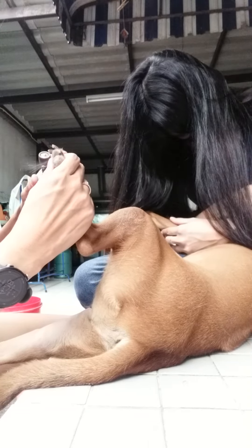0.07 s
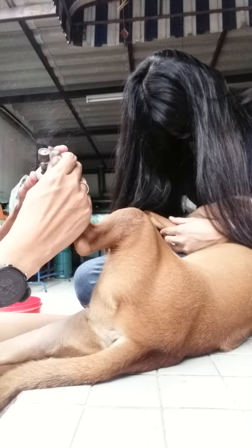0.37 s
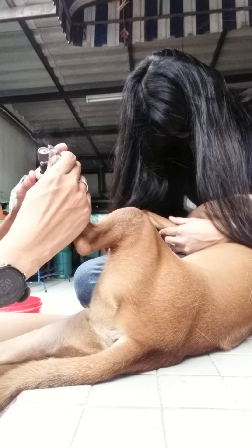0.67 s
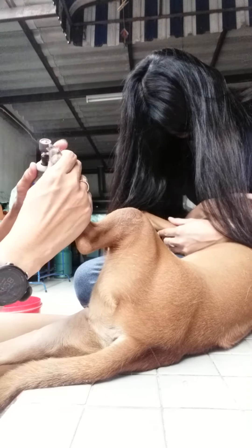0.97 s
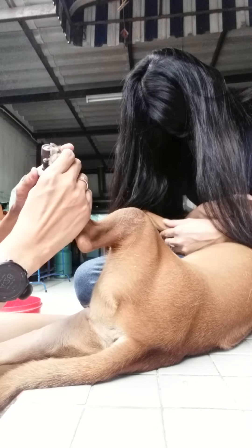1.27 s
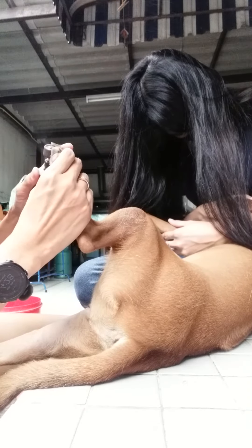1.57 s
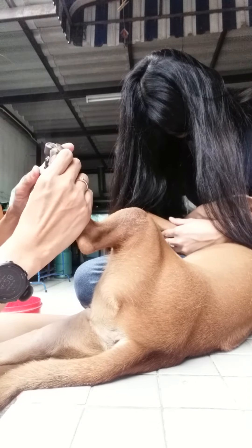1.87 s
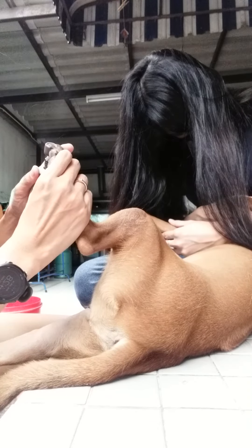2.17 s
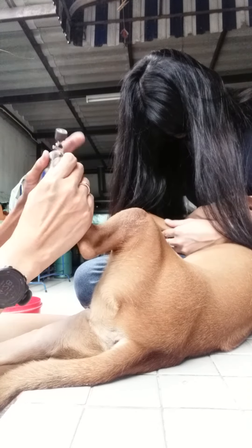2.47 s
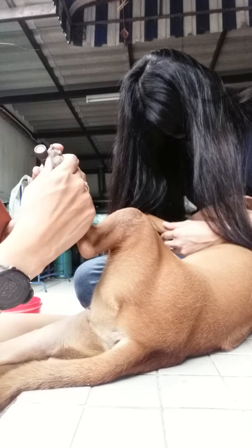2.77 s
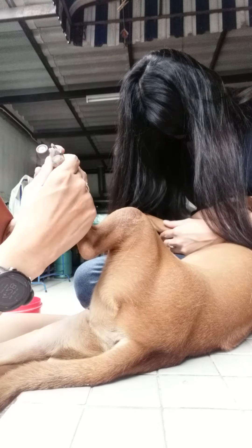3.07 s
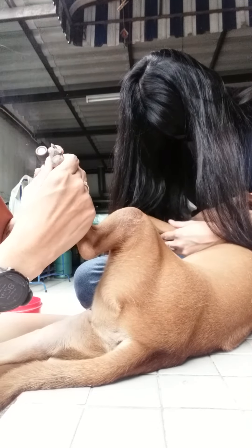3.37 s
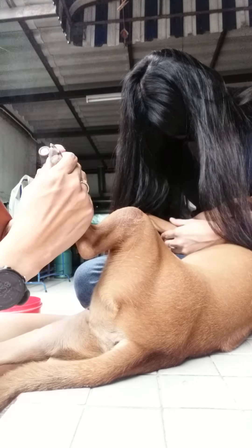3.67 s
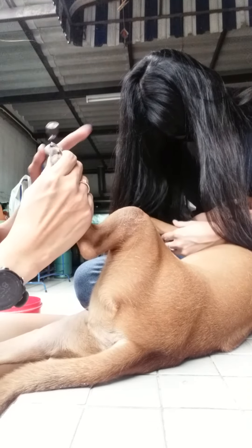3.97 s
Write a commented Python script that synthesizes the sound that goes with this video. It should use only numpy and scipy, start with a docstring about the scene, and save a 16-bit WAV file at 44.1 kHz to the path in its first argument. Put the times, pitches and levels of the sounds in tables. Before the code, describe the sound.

A small rotary grinder whines up close throughout, rasping and chattering against a dog's nail. The scraping swells with a brief squeal near 0.8 seconds, eases at 1.1, then builds to another squeal around 2.3. The motor spins freely until a tick at 2.7 starts more grinding, harshest near 3.7, before running free again. Its pitch sags with each press. Faint outdoor rumble lies underneath.

```python
"""Filing a dog's nails

A small handheld rotary grinder works on a tiled, roofed porch, with faint outdoor rumble behind it.
The motor whines at six times its spin rate and slows under load. When the drum touches the nail,
the same grit scrapes past on every turn. The nail knocks once a turn and makes the housing ring,
ticks as the drum catches it, and squeals when pressed."""
import sys
import numpy as np
from scipy import signal
from scipy.fft import rfft, irfft, next_fast_len
from scipy.io import wavfile
from scipy.ndimage import uniform_filter1d

SR = 44100
rng = np.random.default_rng(int(sys.argv[2]) if len(sys.argv) > 2 else 0)


def bounce(signal):
    """Save signal as a 16-bit WAV file at the path given by the first command-line argument."""
    frames = np.transpose(np.atleast_2d(signal))
    limited = np.clip(frames, -1, 1)
    pcm = np.round(limited * 32767).astype(np.int16)
    wavfile.write(sys.argv[1], SR, pcm)


N = 176400
TIME = np.arange(N) / SR

# How fast the drum spins: time_s, turns_per_s
SPIN_SPEED = [(0.0, 208.5), (0.15, 193.4), (0.2, 193.8), (0.284, 180.2), (0.404, 191.4), (0.549, 188.4),
              (0.703, 196.6), (0.833, 185.1), (0.923, 171.4), (0.953, 173.0), (0.983, 182.1),
              (1.063, 190.0), (1.127, 201.7), (1.187, 205.7), (1.287, 202.1), (1.551, 197.6),
              (1.616, 193.7), (2.15, 181.9), (2.38, 177.4), (2.434, 193.9), (2.504, 202.9), (2.594, 206.0),
              (2.804, 203.6), (3.118, 181.4), (3.377, 183.9), (3.447, 190.1), (3.522, 188.4),
              (3.667, 174.2), (3.692, 168.6), (3.727, 153.5), (3.746, 149.7), (3.786, 155.0),
              (3.826, 184.4), (3.861, 196.2), (3.931, 204.8), (4.001, 205.3)]
# How the motor's main whine rises and falls: time_s, level_db
WHINE_LEVEL = [(0, -26.5), (0.08, -35), (0.2, -41), (0.33, -47), (0.42, -35.5), (0.8, -32.5), (0.93, -59),
               (1.1, -29), (1.38, -28.5), (1.5, -34.5), (1.72, -31.5), (2.15, -37.5), (2.3, -47),
               (2.41, -36.5), (2.49, -26.5), (2.8, -30), (3.0, -39.5), (3.17, -53), (3.55, -37),
               (3.79, -53), (3.87, -29.5), (4, -28.5)]
# The motor's other tones: multiple_of_spin, level_db, share_of_whine_swing_followed
MOTOR_TONES = [(3, -47, 0.42), (4, -43, 0.53), (5, -51.5, 0.036), (7, -41.5, 0.2), (8, -49.5, 0.12),
               (9, -44, 0.67), (10, -54.5, 0.017), (11, -52, 0.25), (12, -46.5, 0.65), (13, -51, 0.3),
               (14, -55.5, 0.22), (15, -48, 0.4)]
# How strongly the case sings along with the motor: time_s, level_db
CASE_LEVEL = [(0, -41.5), (.1, -35), (.25, -41.5), (.6, -44), (.7, -36.5), (1.2, -39.5), (1.32, -37),
              (1.42, -42), (1.88, -42), (2.0, -37), (2.2, -32.5), (2.42, -41), (2.6, -38), (2.8, -39.5),
              (2.95, -48), (3.6, -49), (4, -45)]
# Tone colour of the buzz from the motor's brushes: pitch_hz, gain_db
BUZZ_COLOUR = [(500, -7.5), (2000, -24.5), (3000, -10), (3750, 8.5), (4700, -2), (6000, -23), (8500, -5.5),
               (11500, -17.5), (13500, -41), (15500, -35)]
# How hard the nail knocks on the drum: time_s, level_db
KNOCK_LEVEL = [(0, -42), (0.05, -30.5), (0.25, -38.5), (0.295, -28.5), (0.34, -44), (0.46, -36),
               (0.62, -31), (0.69, -36), (0.77, -32.5), (0.9, -28.5), (0.935, -36), (1.06, -29), (1.1, -49),
               (1.21, -34), (1.27, -33.5), (1.54, -38.5), (1.59, -30), (1.84, -41), (1.91, -31),
               (2.08, -33.5), (2.32, -29), (2.42, -37), (2.78, -41), (2.87, -40), (3.03, -33.5),
               (3.07, -56), (3.33, -40), (3.41, -33), (3.5, -37), (3.66, -31.5), (3.71, -44.5), (3.76, -34),
               (3.82, -29), (4, -47)]
# Uneven knock timing, low when the nail sits firmly, high when it chatters: time_s, scatter_turns
NAIL_CHATTER = [(0, 0.012), (.3, 0.011), (.45, 0.013), (.8, 0.0023), (.9, 0.02), (1.05, 0.0019),
                (1.27, 0.019), (1.48, 0.016), (1.58, 0.0013), (2.2, 0.0012), (2.38, 0.021), (2.5, 0.0058),
                (2.85, 0.01), (3.07, 0.00099), (3.33, 0.00082), (3.4, 0.0046), (3.47, 0.0018),
                (3.62, 0.0018), (3.73, 0.017)]
# Pitches at which the knocked housing rings: pitch_hz, width_hz, gain_db
HOUSING_RINGS = [(1132, 384, 2.5), (1349, 223, 6.5), (1534, 270, 1), (2740, 470, -8.5), (4590, 105, -11.5),
                 (5900, 310, -16)]
# How hard the grit scrapes the nail: time_s, level_db
SCRAPE_LEVEL = [(0, -39), (0.02, -36), (0.19, -41), (0.207, -28.5), (0.24, -35), (0.4, -39.5),
                (0.48, -33.5), (0.62, -42.5), (0.71, -38.5), (0.76, -30), (0.89, -25), (0.94, -20),
                (0.98, -34.5), (1.04, -36.5), (1.085, -35), (1.098, -48), (1.222, -49), (1.235, -40),
                (1.35, -43), (1.38, -52), (1.42, -38.5), (1.85, -37), (2.0, -32.5), (2.355, -28),
                (2.397, -21), (2.405, -46), (2.47, -49), (2.724, -52.5), (2.729, -34), (2.742, -41.5),
                (2.765, -55), (2.804, -53), (2.81, -33.5), (2.845, -36), (2.875, -38.5), (2.95, -33.5),
                (2.99, -40), (3.08, -32), (3.23, -31), (3.38, -39), (3.68, -30.5), (3.73, -21.5),
                (3.763, -24), (3.772, -48.5), (3.83, -48.5), (4, -52)]
# Tone colour of the scraping: pitch_hz, gain_db
SCRAPE_COLOUR = [(400, -14), (1000, 2), (1500, 12), (2100, -3), (2700, 2.5), (3100, -3), (3700, 6.5),
                 (4600, -1.5), (5700, 0), (6900, -4.5), (8500, 0), (10000, 0), (11800, 0.5), (13500, -2.5),
                 (15500, -5)]
# The scraped nail rings at different pitches from time to time as its grip changes: start_s, end_s, pitch_hz,
# half_width_hz, gain_db
SCRAPED_NAIL_RINGS = [(0.413, 0.56, 5200, 600, -4), (0.936, 1.06, 5140, 448, 3.5),
                      (1.88, 2.4, 3570, 298, -4), (1.95, 2.42, 10400, 497, -16),
                      (2.697, 3.8, 11810, 780, -1), (3.537, 3.79, 4750, 600, -8.5),
                      (3.735, 3.77, 5640, 1200, -1.5)]
# Tone colour of the outdoor rumble: pitch_hz, gain_db
RUMBLE_COLOUR = [(20, -37), (45, -16), (66, -44), (80, 5.5), (97, -8), (115, 2), (150, -3.5), (220, -2),
                 (350, -6.5), (600, -3), (1200, -8.5), (3000, -12), (15000, -29)]
# Ticks as the drum catches the nail: start_s, level_db
CATCH_TICKS = [(.204, -34), (1.228, -38), (1.294, -35), (2.728, -29), (2.809, -31)]
# Squeals of the pressed nail: start_s, end_s, pitch_hz, level_db, flutter_db
# A row that ends before it starts is silent.
NAIL_SQUEALS = [(0.74, 0.867, 1570, -26, 3), (0.826, .905, 1600, -24, 3.5), (2.21, 2.36, 1520, -29, 1.5),
                (3.43, 3.62, 1510, -39, 0.5), (3.13, 2.6, 2800, -39.5, 2), (1.41, 2.4, 5750, -47, 1.5),
                (1.8, 1.7, 4560, -42, -2)]
# How much louder the left side is than the right: pitch_hz, left_minus_right_db
LEFT_BALANCE = [(300, -12), (740, -14), (1250, -8), (1600, -18.5), (2010, 0.5), (2700, -1), (3500, 1.5),
                (5500, -7), (9080, 4.5), (11500, -4), (15000, -9)]
# How far the left side's wave runs ahead of the right's: pitch_hz, lead_radians
LEFT_LEAD = [(100, 0), (700, .25), (1290, -.3), (1600, .5), (2000, 1.2), (2580, 1.5), (5250, 6.1),
             (8500, 9.6), (10200, 10.9), (15500, 16.7)]

PULLS_PER_TURN = 6   # the motor's pulls set the pitch of the whine
SIDES = np.array([[1], [-1]])   # add on the left, subtract on the right


def from_db(db):
    """Turn decibels into a number to multiply a sound by."""
    return 10 ** (np.asarray(db) / 20)


def unit_power(x):
    """Scale a signal so that its average power is 1."""
    return x / np.sqrt(np.mean(x ** 2) + 1e-20)


def over_time(rows):
    """Join a table's points with straight lines, giving a value for every sample."""
    return np.interp(TIME, *np.transpose(rows))


def at_pitch(rows, hz):
    """Read a table between its pitches, with every octave equally wide."""
    pitches, values = np.transpose(rows)
    return np.interp(np.log(hz + 1), np.log(pitches), values)


def filtered(x, response):
    """Multiply each frequency in a sound by response(hz)."""
    size = next_fast_len(N + SR // 2)
    hz = np.arange(size // 2 + 1) * SR / size
    return irfft(rfft(x, size) * response(hz), size)[..., :N]


def coloured(x, colour):
    """Give a sound the tone colour in a table, at power 1."""
    return unit_power(filtered(x, lambda hz: from_db(at_pitch(colour, hz))))


def drift(rate_hz):
    """A smooth random wobble, about 1 in size, that changes roughly rate_hz times a second."""
    step, warm_up = 40, 2000
    keep = np.exp(-2 * np.pi * rate_hz * step / SR)
    noise = rng.standard_normal(N // step + warm_up + 2)
    slow = signal.lfilter([1], [1, -2 * keep, keep * keep], noise)[warm_up:]
    return np.interp(np.arange(N) / step, np.arange(len(slow)), unit_power(slow))


def during(start_s, end_s, fade_s=.03):
    """1 while a contact lasts and 0 outside it, with short fades."""
    return np.clip(np.minimum(TIME - start_s, end_s - TIME) / fade_s + .5, 0, 1)


def touching(touch_db=-47.5):
    """Near 1 while the nail is on the drum, near 0 once the scraping falls well below touch_db."""
    return 1 / (1 + from_db(touch_db - over_time(SCRAPE_LEVEL)) ** 2)


def clicks(turns, at_turn, strength):
    """Make a click each time the shaft's running count of turns reaches a value in at_turn."""
    position = 2 * np.interp(at_turn.ravel(), turns, np.arange(N))   # in half samples, for finer timing
    strength = (strength * (at_turn > turns[0]) * (at_turn < turns[-1])).ravel()
    slot = position.astype(int)
    before = np.bincount(slot, strength * (1 - position + slot), 2 * N)
    after = np.bincount(slot + 1, strength * (position - slot), 2 * N)
    return signal.resample_poly(before + after, 1, 2)


def rough_spots(turns, fresh_share, memory_turns, swell_depth, count, max_turns=900):
    """Rough spots click past once a turn; their bite changes slowly, and is partly new each time."""
    slip_turns, size_spread_db = 0.0006, 4.5   # tiny slips in timing turn the highest tones into hiss
    shape = (max_turns, count)
    angle = (np.arange(count) + rng.random(count)) / count
    at_turn = np.arange(max_turns)[:, None] + angle + slip_turns * rng.standard_normal(shape)
    keep = np.exp(-1 / memory_turns)
    first_bite = rng.standard_normal((1, count))
    changes = rng.standard_normal(shape)
    bite, _ = signal.lfilter([np.sqrt(1 - keep ** 2)], [1, -keep], changes, axis=0, zi=keep * first_bite)
    chips = rng.standard_normal(shape)
    sizes = from_db(size_spread_db * np.clip(rng.standard_normal(shape), -2, 2))
    fresh = np.clip(np.interp(at_turn, turns, np.broadcast_to(fresh_share, N)), 0, 1)
    strength = np.sqrt(1 - fresh) * bite + np.sqrt(fresh) * unit_power(chips * sizes)
    swell = 1 + swell_depth * np.cos(2 * np.pi * angle)   # rises and falls once a turn
    return clicks(turns, at_turn, swell * strength)


def singing(turns, hz, half_width_hz):
    """A part that rings near hz sings on whichever multiples of the spin come close, at power 1."""
    spin = over_time(SPIN_SPEED)
    multiples = np.arange(int(hz / spin.max()), int(hz / np.percentile(spin, 10)) + 2)[:, None]
    weight = 1 / (1 + ((multiples * spin - hz) / half_width_hz) ** 2)
    tones = np.sin(2 * np.pi * multiples * (turns + rng.random()))
    return np.sum(weight * tones, axis=0) / np.sqrt(np.sum(weight ** 2, axis=0) / 2)


def motor(turns):
    """Six pulls a turn make the whine; other tones join it, the case sings and the brushes buzz."""
    free_running_db, whine_gain_db, waver_db, brush_db = -24, -0.7, 2, -47
    whine_db = over_time(WHINE_LEVEL)
    tones = from_db(whine_db + whine_gain_db) * np.sin(2 * np.pi * PULLS_PER_TURN * turns)
    for multiple, db, follows in MOTOR_TONES:
        level_db = db + follows * (whine_db - free_running_db) + waver_db * drift(12.2)
        tones += from_db(level_db) * np.sin(2 * np.pi * (multiple * turns + rng.random()))
    case_db = over_time(CASE_LEVEL) + waver_db * drift(45)
    case = from_db(case_db) * singing(turns, hz=2700, half_width_hz=140)
    sparks = rough_spots(turns, fresh_share=0.046, memory_turns=110, swell_depth=1.0, count=60)
    return np.sqrt(2) * tones + case + from_db(brush_db) * coloured(sparks, BUZZ_COLOUR)


def housing_ring(hits, knock_db):
    """Hits ring the housing; firm knocks favour the higher of its rings below 2000 Hz."""
    usual_knock_db, brightening, waver_db = -33, 2, 3
    pivot_hz = HOUSING_RINGS[1][0]
    sound = 0
    for k, (hz, width_hz, db) in enumerate(HOUSING_RINGS):
        keep = np.exp(-np.pi * width_hz / SR)
        feed = (1 - keep ** 2) / 2
        ring_filter = [feed, 0, -feed, 1, -2 * keep * np.cos(2 * np.pi * hz / SR), keep ** 2]
        ring = signal.sosfilt([ring_filter] * 2, hits + 1e-18)
        tilt_db = brightening * (knock_db - usual_knock_db) * np.log2(hz / pivot_hz) * (hz < 2000)
        sound += (-1) ** k * from_db(db + tilt_db + waver_db * drift(22)) * ring
    return sound


def without_whine(x, turns):
    """Cut the whine's pitch out of a sound, leaving that pitch to the motor."""
    whine_wave = np.exp(2j * np.pi * PULLS_PER_TURN * turns)
    amount = signal.sosfiltfilt(signal.butter(2, 25, fs=SR, output="sos"), x / whine_wave)
    return x - 2 * np.real(amount * whine_wave)


def knocking(turns, max_turns=900):
    """The drum's high spot hits the nail once a turn, with a weaker rebound; the housing rings."""
    wander_turns, rebound_turns, rebound_db = 0.036, 0.316, -12.5
    spread_db_per_turn, gain_db, sputter_db = 191, 1.5, 2
    turn, level_db = np.arange(max_turns), over_time(KNOCK_LEVEL)
    scatter = np.interp(turn, turns, over_time(NAIL_CHATTER))
    wander = wander_turns * np.interp(turn, turns, drift(3.48))
    hit_at = turn + wander + scatter * rng.standard_normal(max_turns)
    rebound_at = hit_at + rebound_turns * (1 + 0.099 * np.interp(turn, turns, drift(1.27)))
    # Uneven timing also means uneven strength.
    chance = np.clip(rng.standard_normal((2, max_turns)), -2, 1.5)
    hit_size, rebound_size = from_db(spread_db_per_turn * scatter * chance)
    hits = clicks(turns, hit_at, hit_size) + from_db(rebound_db) * clicks(turns, rebound_at, rebound_size)
    ring = without_whine(housing_ring(hits, level_db), turns)
    levelled = ring / np.sqrt(uniform_filter1d(unit_power(ring) ** 2, size=2600) + .01)
    uneven_db = sputter_db * np.tanh(drift(27))   # the nail catches unevenly
    return unit_power(levelled) * touching() * from_db(level_db + gain_db + uneven_db)


def scraping(turns):
    """Grit rasps the nail: pitched when it sits firmly, noisier in chatter, bright and noisy if pressed."""
    seated_fresh, fresh_per_scatter, hard_press_db = .004, 8, -16
    usual_db, brightening, treble_hz = -39.5, 0.55, 7200
    side_db, gain_db, flutter_db = -4, 3, 1.5
    level_db = over_time(SCRAPE_LEVEL)
    fractures = np.minimum(from_db(level_db - hard_press_db), 1) ** 3
    fresh_share = seated_fresh + fresh_per_scatter * over_time(NAIL_CHATTER) + fractures
    middle, side = (rough_spots(turns, fresh_share, memory_turns=40, swell_depth=0.37, count=110)
                    for _ in range(2))
    scrape = coloured(middle + from_db(side_db) * side * SIDES, SCRAPE_COLOUR)
    # Under pressure, the lower part swells less than the treble.
    low = filtered(scrape, lambda hz: 1 / (1 + (hz / treble_hz) ** 6))
    scrape = scrape - low + low * from_db(brightening * (usual_db - level_db))
    rings = 0
    for start_s, end_s, hz, half_width_hz, db in SCRAPED_NAIL_RINGS:
        ring = signal.lfilter(*signal.iirpeak(hz, hz / (2 * half_width_hz), fs=SR), scrape)
        rings += during(start_s, end_s) * from_db(db) * ring
    return (scrape + rings) * from_db(level_db + gain_db + flutter_db * drift(18.4))


def outdoor_rumble(level_db=-43, side_db=-24, left_minus_right_db=-2):
    """Steady distant rumble, nearly alike on both sides."""
    middle, side = coloured(rng.standard_normal((2, N)), RUMBLE_COLOUR)
    gains = from_db(level_db + SIDES * left_minus_right_db / 2)
    return gains * (middle + SIDES * from_db(side_db) * side)


def catching(decay_s=.006):
    """On first touch, grit chips the nail in a short burst of cracks."""
    cracks = coloured(rng.standard_normal((2, N)) ** 3, SCRAPE_COLOUR)   # cubing makes noise spiky
    bursts = sum(from_db(db) * (TIME > start_s) * np.exp(-np.abs(TIME - start_s) / decay_s)
                 for start_s, db in CATCH_TICKS)
    return cracks * bursts


def squealing(turns):
    """The pressed nail locks to the turning drum and squeals."""
    sound = 0
    for start_s, end_s, hz, db, flutter_db in NAIL_SQUEALS:
        loudness = during(start_s, end_s) * from_db(db + flutter_db * np.tanh(drift(21)))
        sound += loudness * singing(turns, hz, half_width_hz=170)
    return sound


def echoes(fade_s, size=22050):
    """A scatter of echoes, different on each side, that falls by 60 dB in fade_s."""
    t = np.arange(size) / SR
    tail = rng.standard_normal((2, size)) * from_db(-60 * t / fade_s) * (t > .001)
    return tail / np.sqrt(np.sum(tail ** 2, axis=1, keepdims=True))


def microphones(hz):
    """Each pitch reaches two spaced microphones with a different strength and delay."""
    left = from_db(at_pitch(LEFT_BALANCE, hz))
    right = np.exp(-1j * np.interp(hz, *np.transpose(LEFT_LEAD)))
    return np.array([left, right]) * np.sqrt(2 / (1 + left ** 2))


def porch(direct, near_db=-3.5, far_db=-15, low_cut_hz=1900):
    """The direct sound arrives along with bright echoes from hands, tiles and roof."""
    tail = from_db(near_db) * echoes(fade_s=0.081) + from_db(far_db) * echoes(fade_s=.33)
    bright_tail = signal.sosfilt(signal.butter(2, low_cut_hz, "high", fs=SR, output="sos"), tail)
    reflected = signal.fftconvolve(direct, bright_tail, axes=1)[:, :N]
    return filtered(direct + reflected, microphones)


def scene():
    """One shaft drives the motor sound, knocks, scraping and squeals; a chattering nail shakes the motor."""
    base_jitter, jitter_per_scatter, shake_db_per_turn = 0.0013, .2, 300
    chatter = over_time(NAIL_CHATTER) * touching()
    jitter = base_jitter + jitter_per_scatter * chatter   # as a share of the spin speed
    spin = over_time(SPIN_SPEED) * (1 + jitter * drift(28.5))
    turns = np.cumsum(spin) / SR   # turns made so far
    shake = from_db(shake_db_per_turn * chatter * np.tanh(drift(39)))
    grinder = shake * motor(turns) + knocking(turns) + squealing(turns) + scraping(turns) + catching()
    return porch(grinder) + outdoor_rumble()


def record(dry):
    """Cut off the very highest treble steeply."""
    cutoff_hz = 15850
    return signal.sosfilt(signal.ellip(12, .1, 80, cutoff_hz, fs=SR, output="sos"), dry)


dry = scene()
out = record(dry)
bounce(out)
```